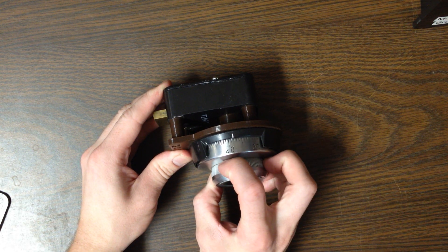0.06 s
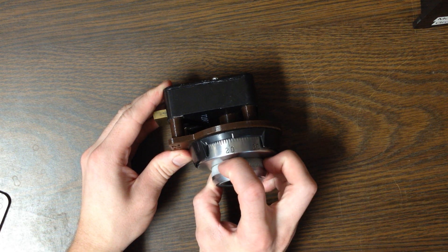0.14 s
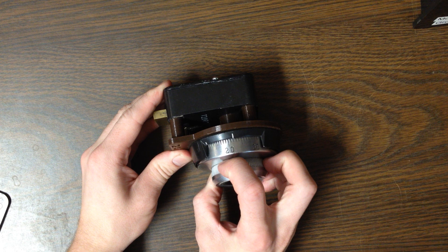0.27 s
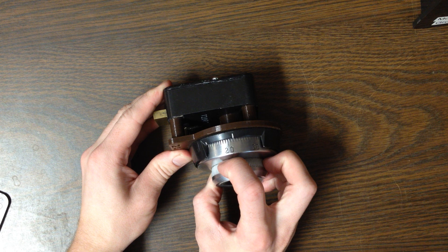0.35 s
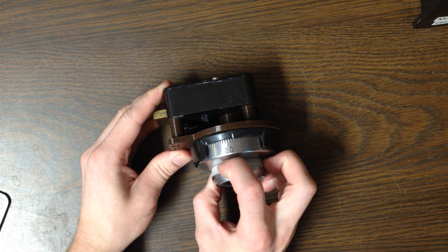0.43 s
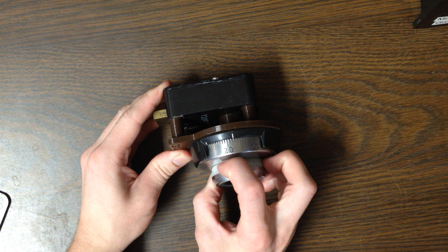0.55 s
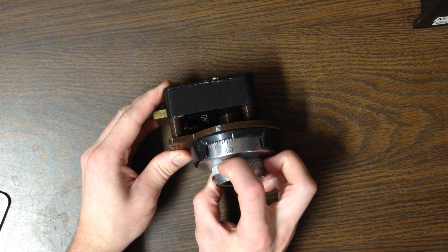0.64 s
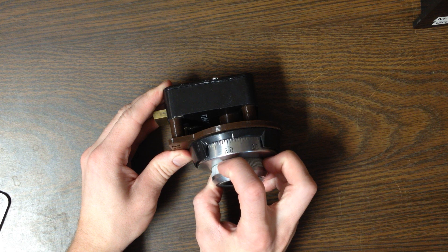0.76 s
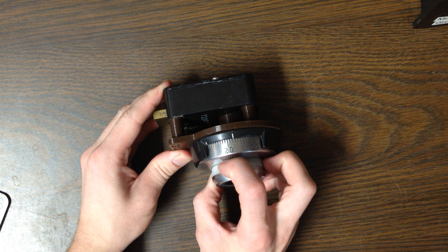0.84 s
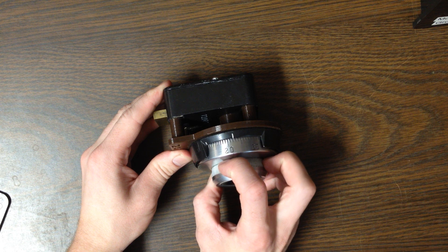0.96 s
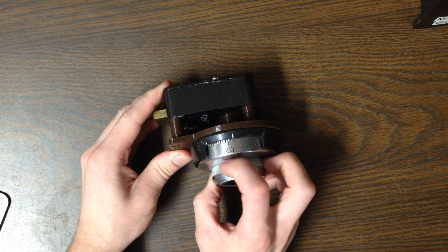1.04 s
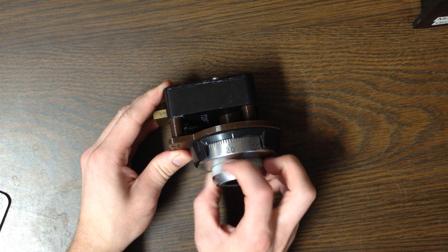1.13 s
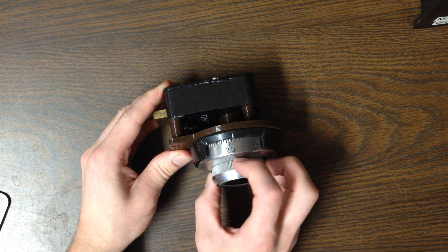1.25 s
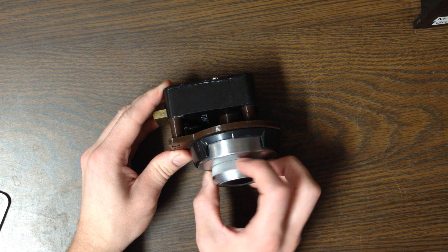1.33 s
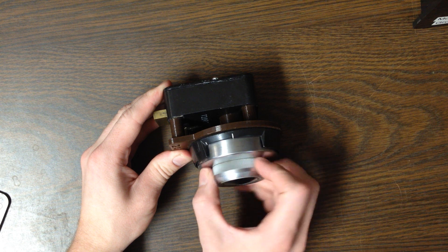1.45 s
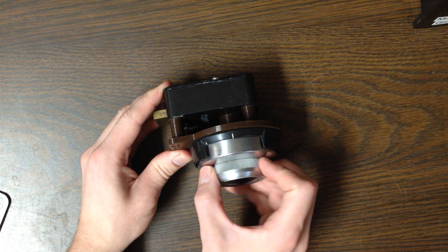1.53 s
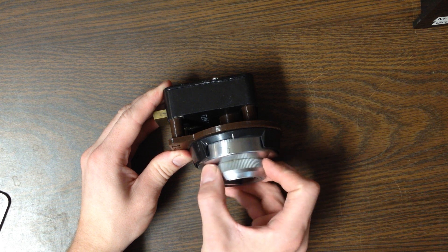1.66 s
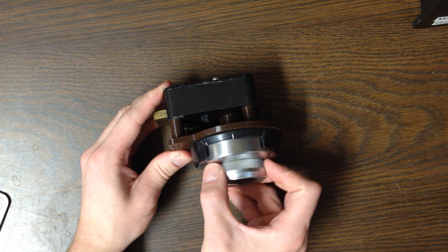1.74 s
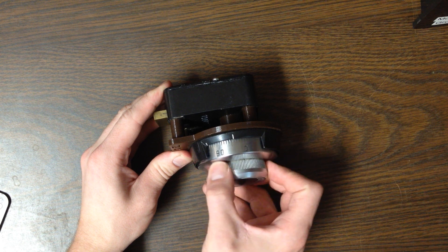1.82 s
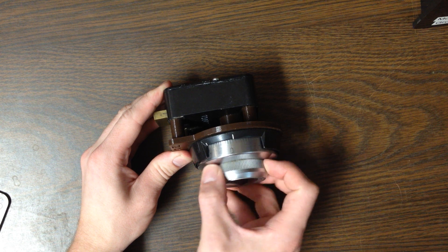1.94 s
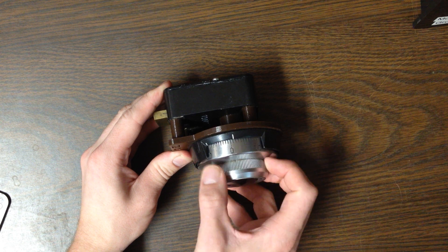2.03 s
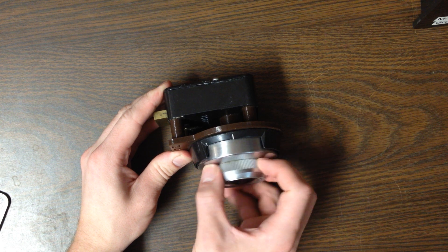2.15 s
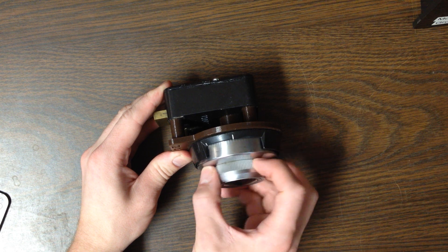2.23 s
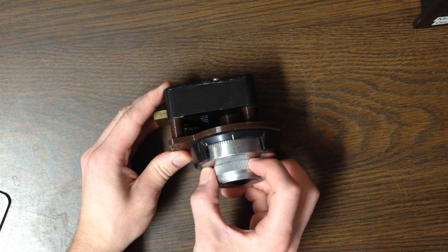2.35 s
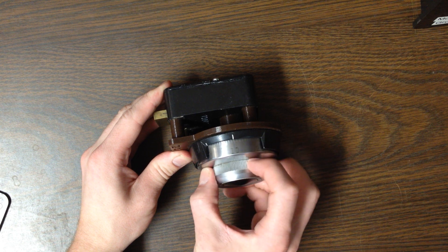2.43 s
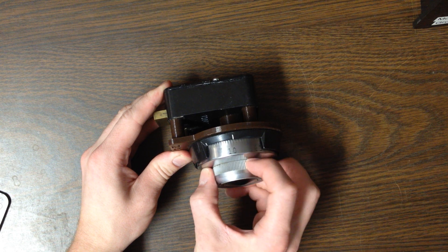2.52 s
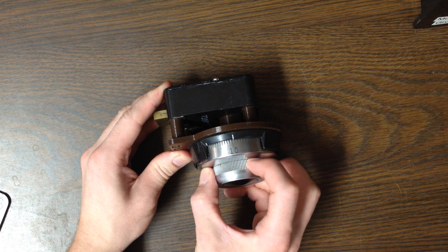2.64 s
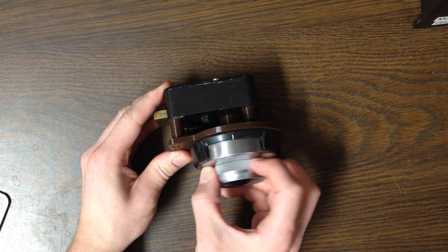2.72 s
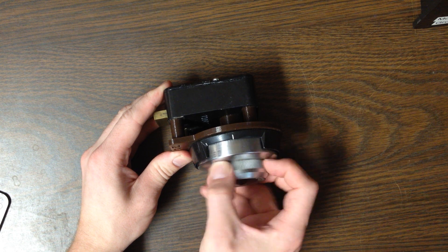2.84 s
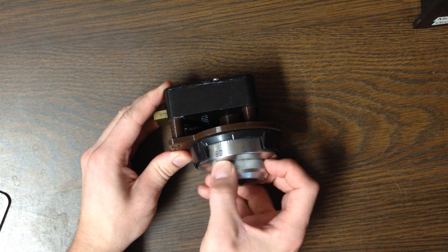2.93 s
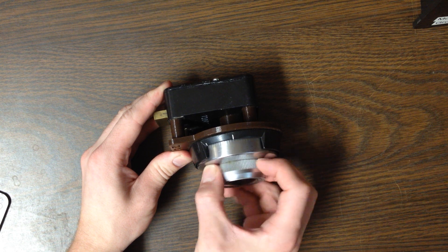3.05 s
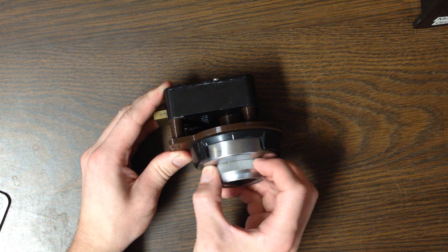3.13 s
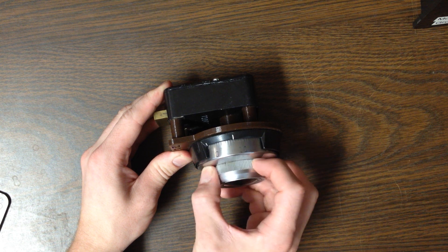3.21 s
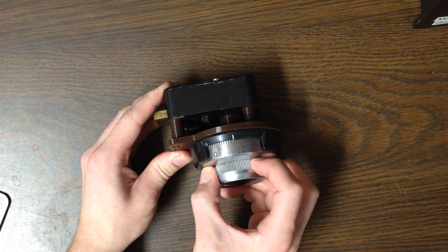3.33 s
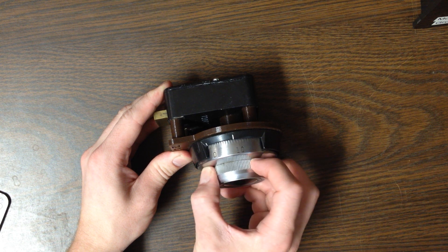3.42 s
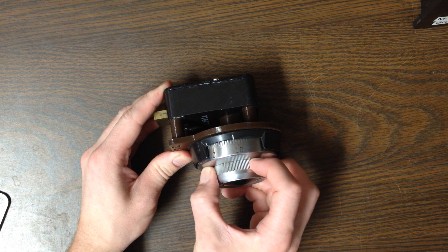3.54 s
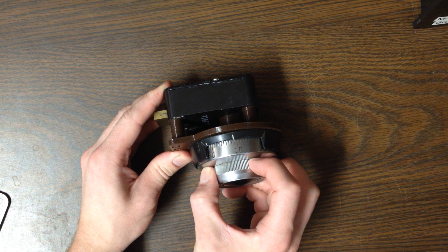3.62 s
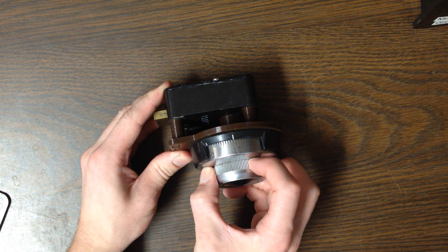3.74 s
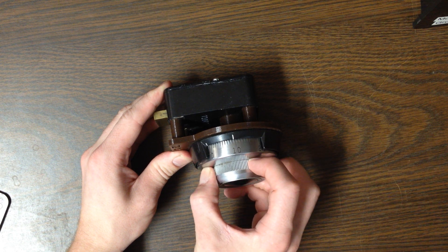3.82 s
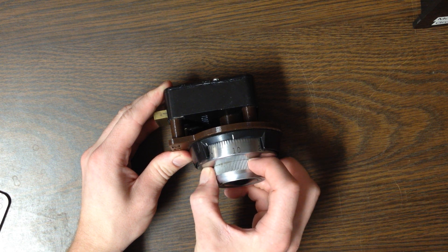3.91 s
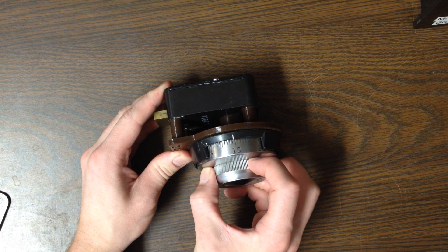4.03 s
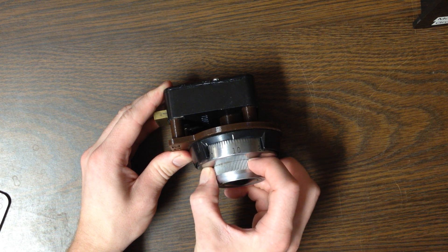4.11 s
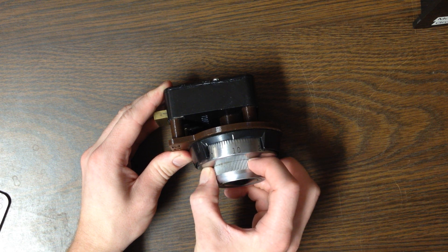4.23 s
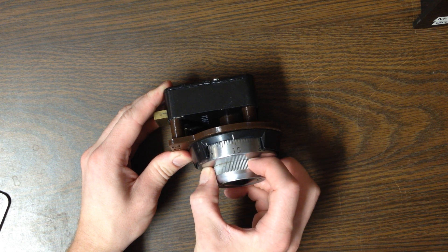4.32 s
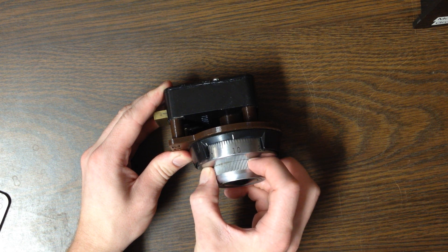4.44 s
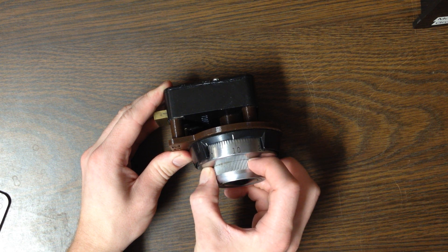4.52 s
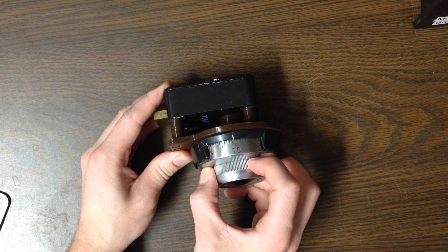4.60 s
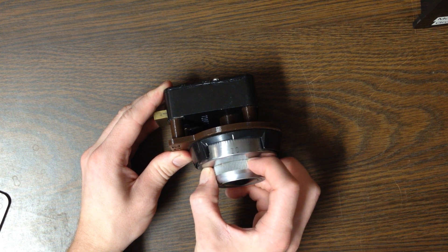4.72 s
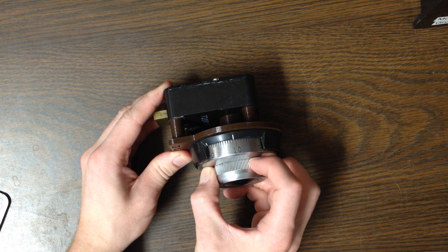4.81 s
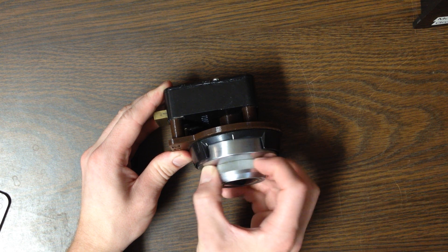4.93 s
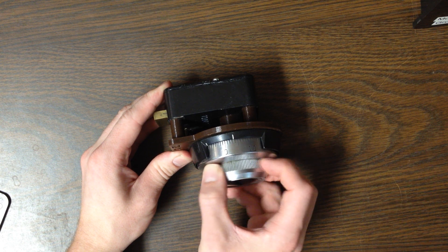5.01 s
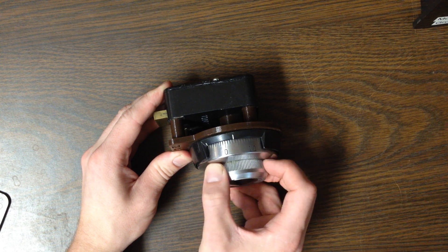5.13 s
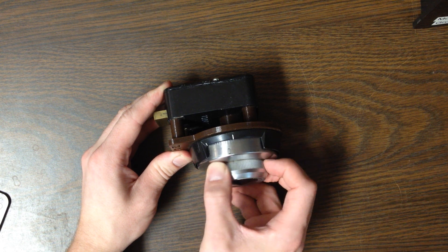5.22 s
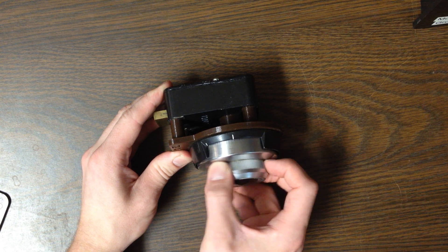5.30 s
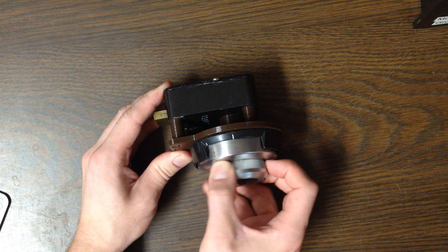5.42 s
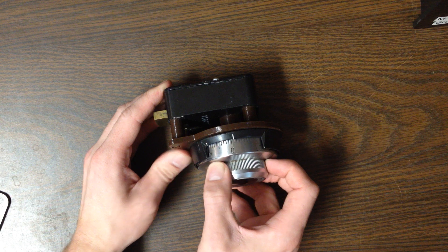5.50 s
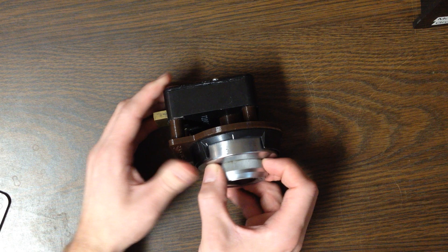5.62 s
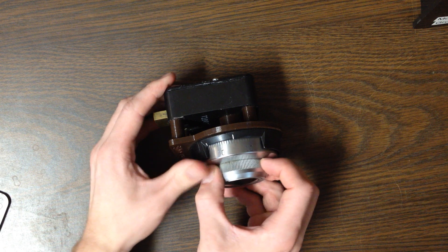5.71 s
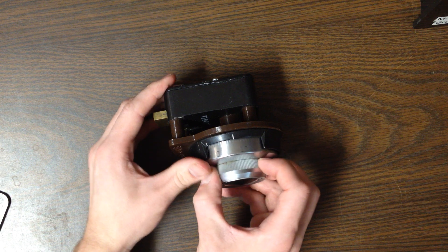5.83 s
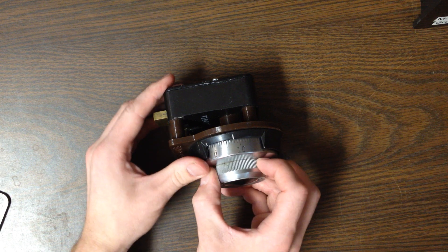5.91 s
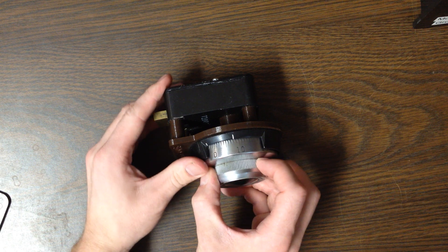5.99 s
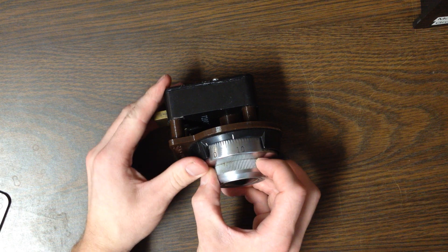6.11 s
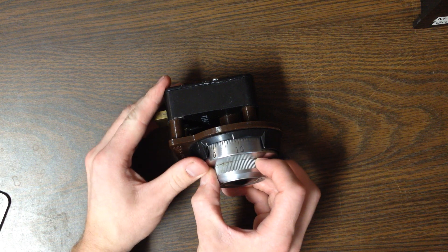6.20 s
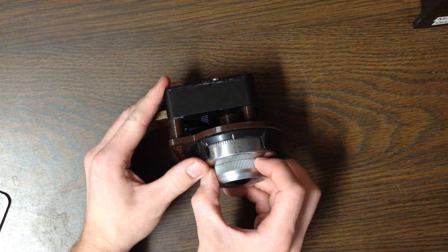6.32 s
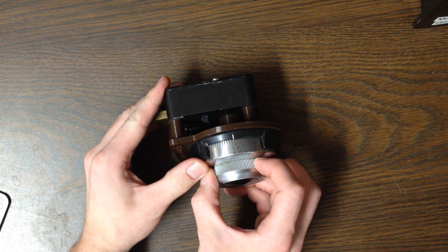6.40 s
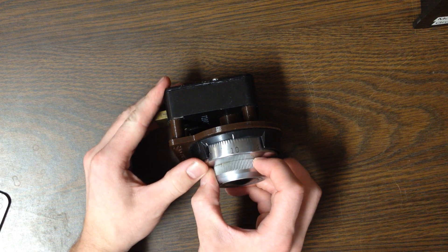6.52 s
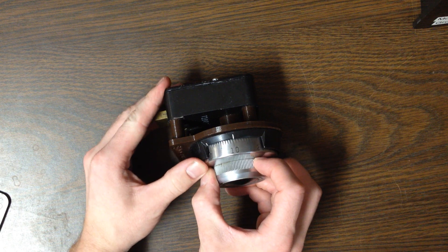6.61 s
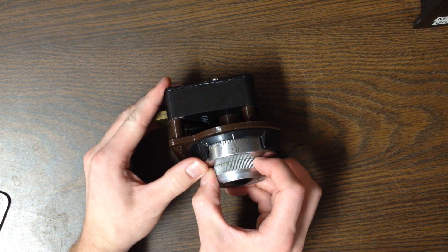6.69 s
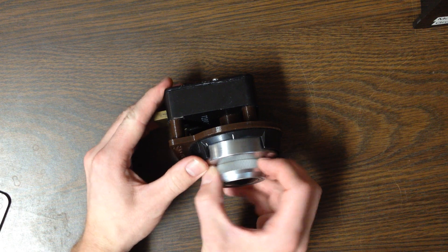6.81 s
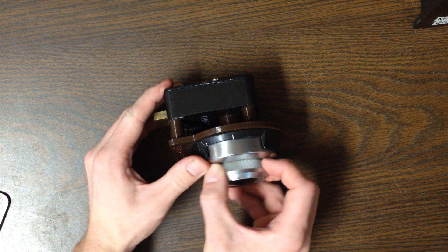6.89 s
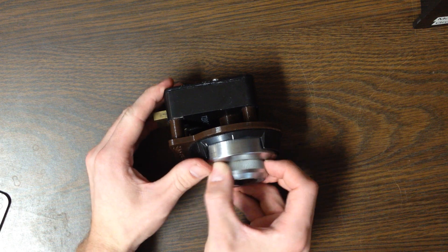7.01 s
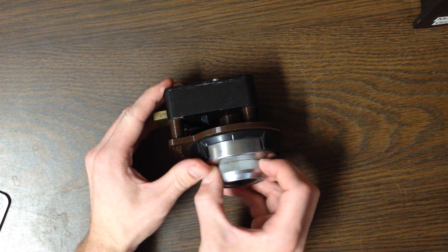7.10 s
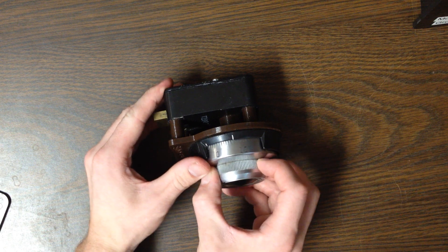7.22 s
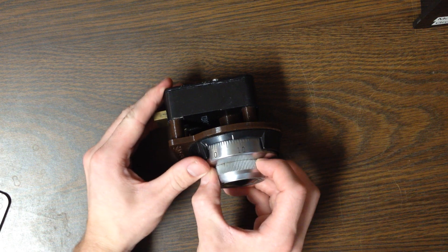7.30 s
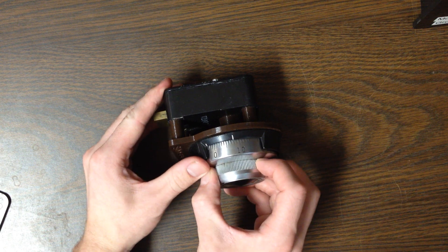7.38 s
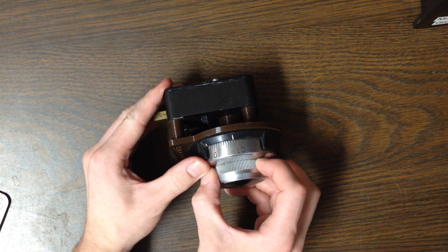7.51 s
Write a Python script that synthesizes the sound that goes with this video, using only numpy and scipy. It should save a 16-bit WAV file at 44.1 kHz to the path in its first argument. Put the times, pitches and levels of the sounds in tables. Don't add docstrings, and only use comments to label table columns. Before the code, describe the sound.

Quiet hum and fan noise open the scene, then faint ticks lead into a sharp steel clack as a lock's lever lifts. Further lifts and drops alternate through the scene, dry and bright, knocking the wooden table beneath. Small loose wheels tick lightly around them. Heard close up in a small room, with brief reflections and no lingering metallic ring.

```python
import sys
import numpy as np
from scipy import signal
from scipy.fft import rfft, irfft, next_fast_len
from scipy.io import wavfile

SR = 44100
rng = np.random.default_rng(int(sys.argv[2]) if len(sys.argv) > 2 else 0)


def dump_mix(stems):
    frames = np.atleast_2d(stems).T
    limited = np.clip(frames, -1, 1)
    pcm = np.round(limited * 32767).astype(np.int16)
    wavfile.write(sys.argv[1], SR, pcm)


def magnitude_from_level(level_db):
    exponent = np.asarray(level_db, float) / 20
    return 10 ** exponent


N = 333011

# (frequency [Hz], level [dB], 60 dB decay [s])
CASE_TONES = [(2033, 4.5, 0.01), (3460, -25.5, 0.081), (3877, -12.5, 0.013), (4745, 0, 0.019),
              (4760, 3.5, 0.012), (6300, 0, .01), (8170, -12.5, 0.03), (8290, -1.5, 0.012), (8790, 5, .01),
              (10330, -2, .012), (11030, 0.5, .015), (12590, -13, .01), (12930, 0, .015),
              (13630, -4, 0.0076), (14480, -0.5, 0.012)]
# (time [s], strength [dB], rebound [dB], panel [dB], low board [dB])
LIFTS = [
    (1.8224, -1.5, 1.5, -1.5, 4),
    (2.9171, 0, -9.5, -1, 2),
    (5.3884, 0, -4, -0.5, -3.5),
    (7.0335, 0.5, -1, -6.5, 8),
]
# (time of the blow [s], strength [dB], rebound [dB], panel [dB], low board [dB])
DROPS = [
    (2.5396, -2, -1.5, 1, 3),
    (4.7370, -2.5, -7.5, 1, 6.5),
    (6.5791, -2.5, -4, 2, 6),
]
LIFT_CONTACT_TIMES = [-.1, 1.7, 5.2, 8, 11.7]
DROP_CONTACT_TIMES = [-7.7, -6.3, -4.7, -3, -.2, .7, 7.5]
# (knock [dB], clack [dB], click [dB], tick [dB])
LIFT_CONTACTS = [
    (-51, -33.5, -44.5, -15.5),
    (-34.5, -32.5, -29, -22),
    (-43.5, -37.5, -41.5, -28.5),
    (-44.5, -36.5, -37, -31),
    (-42, -26.5, -31, -25),
]
DROP_CONTACTS = [
    (-40, -35.5, -34, -27.5),
    (-36.5, -39.5, -38.5, -24.5),
    (-34.5, -39, -24, -29),
    (-37.5, -39.5, -30, -32.5),
    (-59.5, -29.5, -32, -32.5),
    (-36.5, -32, -17, -24),
    (-34.5, -37.5, -34, -26),
]


def lever():
    length_ms = 0.5
    lifts = contacts(LIFTS, LIFT_CONTACT_TIMES, LIFT_CONTACTS, length_ms)
    drops = contacts(DROPS, DROP_CONTACT_TIMES, DROP_CONTACTS, length_ms)
    return strike_steel(lifts + drops, CASE_TONES)


def contacts(snaps, delays_ms, pattern, length_ms):
    hits = []
    for s, strength_db, rebound_db, *_ in snaps:
        for late, parts_db in zip(delays_ms, pattern):
            levels_db = np.array(parts_db) + strength_db
            if late == delays_ms[-1]:
                levels_db = levels_db + rebound_db
            hits.append((s + late / 1000, *levels_db, length_ms))
    return hits


# (frequency [Hz], level [dB], 60 dB decay [s])
WHEEL_TONES = [(4030, -1.5, 0.0054), (4550, 6.5, 0.013), (6700, 2, 0.0077), (9300, -18, .005),
               (11200, -5.5, .005), (13250, 3.5, .005), (14600, -12, .005)]
# (time [s], strength [dB], brightening [dB
# per range], extra clack [dB], contact length [ms])
WHEEL_TICKS = [(1.4638, -63, 4.5, -7, 0.63), (1.5252, -58, 3.5, 2, 0.9), (1.635, -64, 1.5, 2, 1.3),
               (2.1995, -55, 2, -0.5, 2), (2.8083, -59, 2, 6.5, 1.2), (2.8461, -66, 1, 2.5, 1.5),
               (2.9405, -43, 3, -0.5, 1.3), (3.0751, -54, 3.5, 2, 1.3), (5.4069, -49, 12, 4, .9),
               (5.653, -58.5, 1.5, -0.5, 3.1), (6.8686, -59.5, 2, 3.5, 1.8), (7.0088, -63.5, 0, -6, 1.6),
               (7.1444, -49.5, 1, -19, 0.51)]


def wheels():
    return strike_steel(ticks(WHEEL_TICKS), WHEEL_TONES)


# (time [s], strength [dB], brightening [dB per range], extra clack [dB])
TOUCHES = [(1.4497, -68.5, -7, -4), (1.536, -68, -0.5, 1), (1.6087, -77, -3, 0), (1.7726, -80, 0.5, 8),
           (1.8224, -58.5, -4, -8), (2.037, -73.5, 0, -1), (2.8936, -66, -2, -6.5),
           (2.9108, -68, -4.5, 5.5), (3.046, -67.5, -5.5, 3), (3.1312, -73, -2, -4), (4.9583, -74, 1, 11.5),
           (4.9851, -81, -3, 0), (5.0292, -73.5, 0.5, 3), (5.097, -74.5, 2.2, 2), (5.347, -72.5, -4, 7),
           (5.3563, -65, -3, -10), (5.3875, -52.5, -10, 7), (5.6902, -83, 2, 16), (6.9036, -72.5, 1, 5.5),
           (6.964, -81.5, -3.5, 8.5), (7.0243, -72, -8, 3)]


def fingers():
    length_ms = 1.3
    return strike_steel(ticks([(*row, length_ms) for row in TOUCHES]), WHEEL_TONES)


def ticks(rows):
    steps = np.arange(4) - 1.5
    clack = np.arange(4) == 1
    return [(s, *(db + tilt_db * steps + clack_db * clack), length_ms)
            for s, db, tilt_db, clack_db, length_ms in rows]


# (low edge [Hz], high edge [Hz])
RANGES = [(1400, 2900), (3000, 5500), (5500, 10600), (10600, 15200)]


def strike_steel(hits, tones):
    ring_db, spread_db, rattle_db, rattle_t60 = -27, 3.5, -19, 0.055
    hold = SR // 625
    near, blows = np.zeros(N), np.zeros(N)
    t = np.arange(SR // 7) / SR
    rise = 1 - np.exp(-t / 0.00036)
    click = 1.0 * (t == 0)
    filters = [signal.butter(2, edges, "band", fs=SR, output="sos") for edges in RANGES]
    for s, *parts_db, length_ms in hits:
        length_ms = max(length_ms, 0.2)
        noise = rng.standard_normal(len(t))
        scuff = noise * rise * np.exp(-t * 1000 / length_ms)
        rattle = magnitude_from_level(rattle_db) * noise * rise * magnitude_from_level(-60 * t / rattle_t60)
        sound = scuff + rattle
        for hz, level_db, t60 in tones:
            own_db = spread_db * rng.standard_normal()
            sound += magnitude_from_level(ring_db + level_db + own_db) * ring(scuff, hz, t60)
        for k, (band, part_db) in enumerate(zip(filters, parts_db)):
            both = signal.sosfilt(band, [sound, click])
            start_rms = np.sqrt(np.mean(both[:, :hold] ** 2, axis=1, keepdims=True))
            both *= (-1) ** k * magnitude_from_level(part_db) / start_rms
            add(near, s, both[0])
            add(blows, s, both[1] * np.sqrt(length_ms))
    return near, blows


# (frequency [Hz], level [dB], 60 dB decay [s])
PANEL = [(403, -8.5, 0.1), (440.5, -2, 0.062), (484.6, -11, 0.032)]
BOARD = [(175.5, -27, 0.1), (220, -9.5, 0.074), (256, -22.5, 0.1)]
KNOCK = [(620, -5, 0.015), (790, -6, 0.035), (935, 1.5, 0.017), (1166, -8.5, 0.024), (1575, -7.5, 0.046),
         (1501, -24.5, 0.14), (2100, -10.5, .02)]
LIFT_PUSH_TIMES = [-2.2, 2.6, 7.1, 14.5]
DROP_PUSH_TIMES = [-6.8, -4.6, 2.2, 10]
# (panel [dB], low board [dB], knock [dB])
LIFT_PUSHES = [(-28, -55.5, -34), (-30, -36.5, -39), (-29, -24.5, -41.5), (-39, -35, -34)]
DROP_PUSHES = [(-30.5, -51.5, -47), (-32.5, -44.5, -39), (-25.5, -33, -24.5), (-29, -31, -33)]
# (time [s], panel [dB], low board [dB], knock [dB])
NUDGES = [
    (1.466, -49.5, -40.5, -69.5),
    (1.527, -52, -61, -51.5),
    (2.034, -66, -33.5, -61),
    (5.1, -75, -36.5, -77),
    (5.346, -51, -50, -53.5),
    (7.144, -45, -60.5, -58),
]


def table():
    spread_db = 1.5
    rows = pushes_of(LIFTS, LIFT_PUSH_TIMES, LIFT_PUSHES)
    rows += pushes_of(DROPS, DROP_PUSH_TIMES, DROP_PUSHES)
    rows = np.array(rows + NUDGES)
    at = np.round(rows[:, 0] * SR).astype(int)
    out = np.zeros(N)
    for column, tones in enumerate([PANEL, BOARD, KNOCK], start=1):
        for hz, level_db, t60 in tones:
            own_db = spread_db * rng.standard_normal(len(at))
            pushes = np.zeros(N)
            pushes[at] = magnitude_from_level(rows[:, column] + level_db + own_db)
            out += ring(pushes, hz, t60)
    out = signal.sosfilt(signal.butter(3, 150, "high", fs=SR, output="sos"), out)
    return signal.sosfilt(signal.butter(2, 1800, fs=SR, output="sos"), out)


def pushes_of(snaps, delays_ms, pattern):
    return [(s + late / 1000, panel + panel_db, board + board_db, knock + db)
            for s, db, _, panel_db, board_db in snaps
            for late, (panel, board, knock) in zip(delays_ms, pattern)]


# (frequency [Hz], 60 dB decay [s])
ROOM_DECAY = [(200, 0.26), (450, .17), (1000, 0.27), (2500, .25), (4000, .25), (6000, 0.3), (9000, 0.29),
              (14000, 0.22)]
# (frequency [Hz], level [dB])
WALLS = [(1000, 17.5), (1560, 10.5), (2250, 4), (3000, -0.5), (4000, 5.5), (5800, -5), (8000, -2.5),
         (10500, -4.5), (13300, -0.5), (15500, -0.5)]


def room(blows, wood):
    steel_db, wood_db, gap_s = -7.5, -5.5, 0.0055
    t, tail = np.arange(SR // 2) / SR, 0
    edges = 90 * 2.0 ** np.arange(0, 7.6, 0.5)
    for low, high in zip(edges, edges[1:]):
        band_filter = signal.butter(2, [low, high], "band", fs=SR, output="sos")
        band = signal.sosfilt(band_filter, rng.standard_normal(len(t)))
        tail = tail + band * magnitude_from_level(-60 * t / at_hz(ROOM_DECAY, np.sqrt(low * high)))
    tail *= np.clip(t / gap_s, 0, 1) ** 2
    sent = magnitude_from_level(steel_db) * coloured(blows, WALLS) + magnitude_from_level(wood_db) * wood
    return signal.fftconvolve(sent, tail / np.sqrt(np.sum(tail ** 2)))[:N]


# (frequency [Hz], level [dB rms])
HUM = [(120, -61.5), (240, -67), (360, -69), (480, -71)]
# (frequency [Hz], width [Hz], level [dB rms])
FAN = [(180, 34, -64.5), (218, 34, -77.5), (310, 3.3, -75), (345, 30, -72), (415, 13, -75.5),
       (515, 30, -68), (845.7, 11, -75), (901.7, 25, -78.5)]
# (frequency [Hz], level [dB per Hz])
AIR = [(24, -65), (45, -44), (85, -31), (123, -11.5), (250, -9.5), (450, -14), (600, -19), (1200, -23),
       (2500, -30.5), (5000, -35), (8000, -40), (10000, -43), (12500, -38.5), (15600, -36)]


def background():
    air_db, top_hz = -62.5, 15450
    t = np.arange(N) / SR
    out = magnitude_from_level(air_db) * rms_one(coloured(rng.standard_normal(N), AIR))
    for hz, db in HUM:
        out += magnitude_from_level(db) * np.sqrt(2) * np.sin(2 * np.pi * hz * t + rng.uniform(0, 2 * np.pi))
    for hz, width, db in FAN:
        t60 = np.log(1000) / np.pi / width
        out += magnitude_from_level(db) * rms_one(ring(rng.standard_normal(N), hz, t60))
    return signal.sosfilt(signal.ellip(10, 0.5, 40, top_hz, fs=SR, output="sos"), out)


def ring(force, hz, t60):
    r, w = magnitude_from_level(-60 / (t60 * SR)), 2 * np.pi * hz / SR
    return signal.lfilter([0, np.sin(w)], [1, -2 * r * np.cos(w), r * r], force + 1e-18)


def add(track, s, sound):
    i = round(s * SR)
    track[i:i + len(sound)] += sound[:N - i]


def rms_one(x):
    return x / np.sqrt(np.mean(x ** 2) + 1e-20)


def at_hz(points, hz):
    table_hz, values = np.array(points).T
    return np.interp(np.log(np.maximum(hz, 1)), np.log(table_hz), values)


def coloured(x, points):
    size = next_fast_len(len(x))
    hz = np.arange(size // 2 + 1) * SR / size
    return irfft(rfft(x, size) * magnitude_from_level(at_hz(points, hz)), size)[:len(x)]


def scene():
    near, blows = np.sum([lever(), wheels(), fingers()], axis=0)
    wood = table()
    return (near + wood + room(blows, wood) + background())[None]


def roll_off(x):
    return signal.sosfilt(signal.butter(12, 16510, fs=SR, output="sos"), x)


def record(dry):
    low_hz, top_hz = 100, 15350
    x = signal.sosfilt(signal.butter(2, low_hz, "high", fs=SR, output="sos"), dry)
    x = signal.sosfilt(signal.ellip(8, 0.5, 38, top_hz, fs=SR, output="sos"), x)
    return roll_off(x)


dry = scene()
out = record(dry)
dump_mix(out)
```